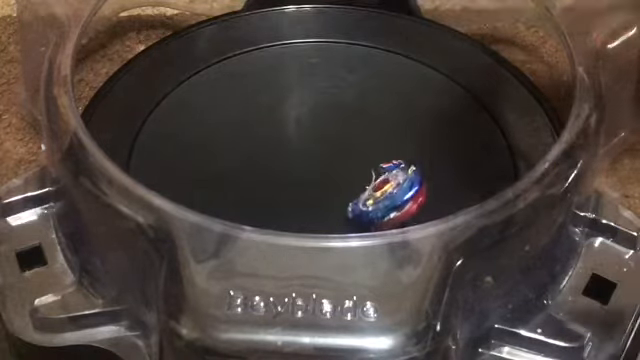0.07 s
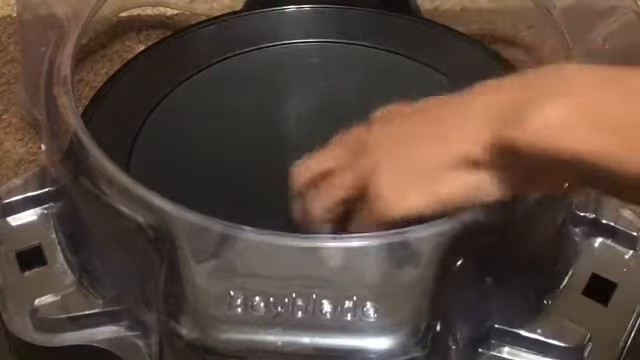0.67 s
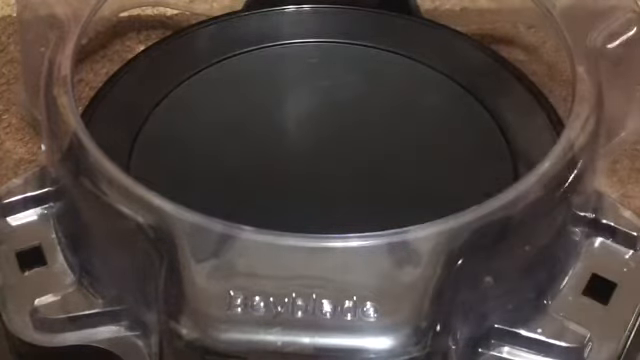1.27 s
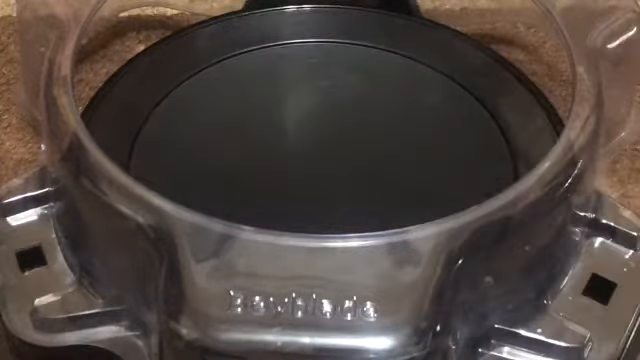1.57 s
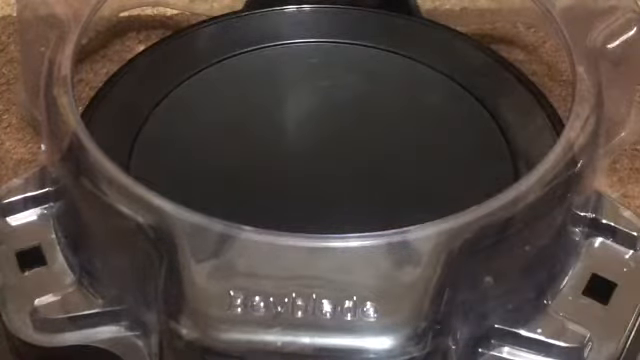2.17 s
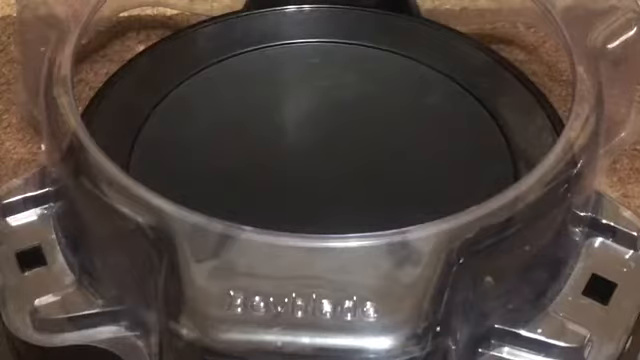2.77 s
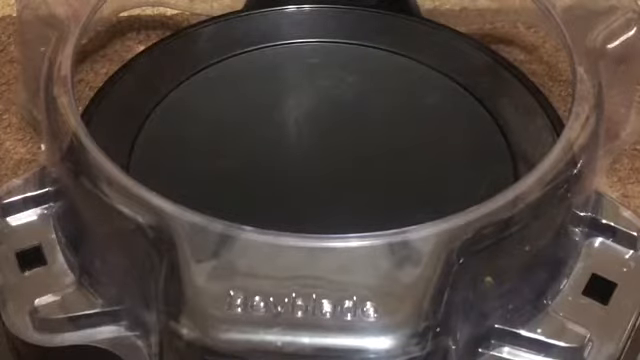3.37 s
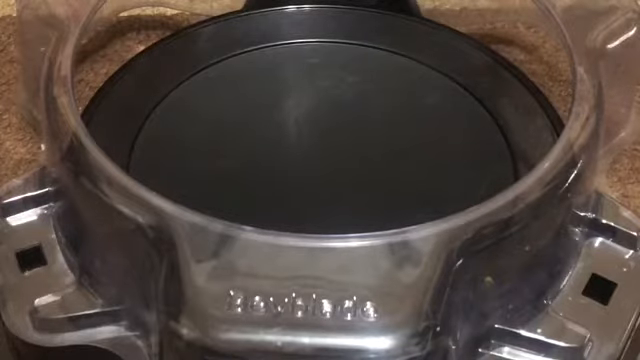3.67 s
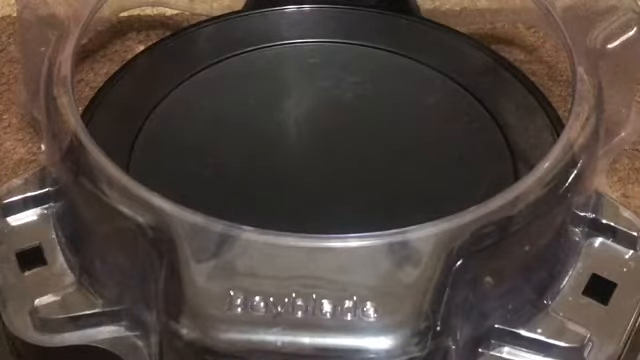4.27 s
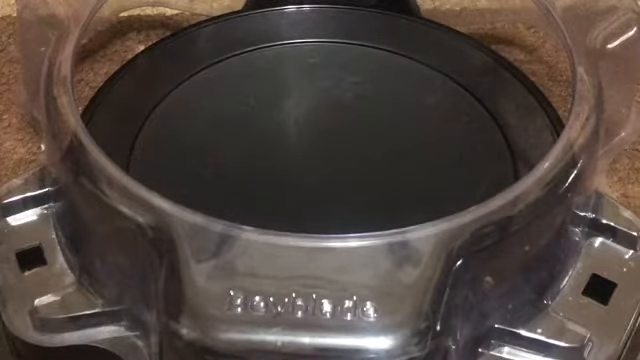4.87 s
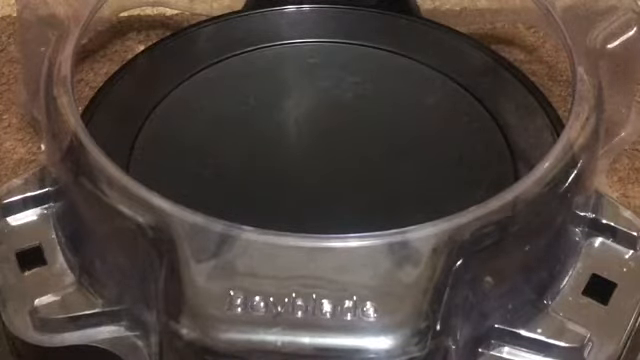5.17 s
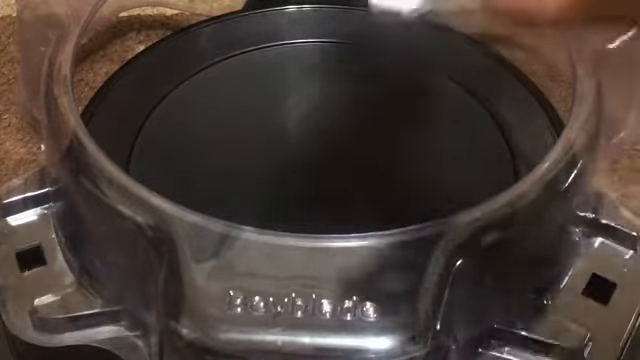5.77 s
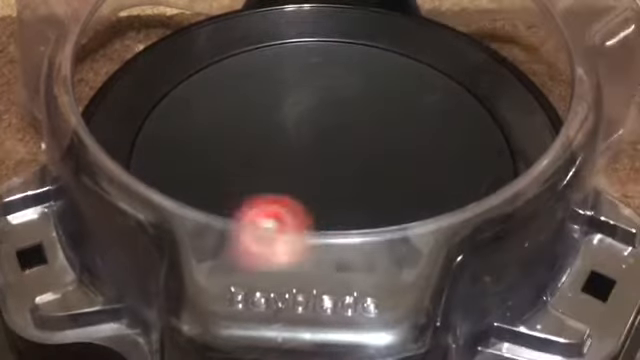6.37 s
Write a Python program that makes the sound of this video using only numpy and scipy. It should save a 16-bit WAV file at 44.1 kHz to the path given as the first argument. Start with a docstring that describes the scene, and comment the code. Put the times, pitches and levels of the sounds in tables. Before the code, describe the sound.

Hands lift a toy top from a plastic bowl and fit it to a launcher with faint clicks, rubs and a few sharper snaps. Near the end a toothed cord rips through the gear in a brief rising, rattling whir. The top hits the bowl with loud hollow knocks and bounces twice. A small room hums softly, heard through a slightly nasal phone microphone.

```python
"""A toy top is ripped off its launcher by a toothed cord: the gear whirs up in pitch, then the top
drops into a thin plastic bowl and bounces twice, driving bending waves that boom and ring.
Before this, hands pick the top out of the bowl and click it onto the launcher, with impacts and
friction on hollow plastic. A small room hums and reverberates, and all is heard through a phone
microphone whose port resonance adds a nasal colour."""
import sys
import numpy as np
from scipy import signal
from scipy.fft import rfft, irfft, next_fast_len
from scipy.io import wavfile

SR = 44100
rng = np.random.default_rng(int(sys.argv[2]) if len(sys.argv) > 2 else 0)


def waveform_to_disk(signal):
    """Save audio, clipped to [-1, 1], as 16-bit WAV at the path in sys.argv[1]."""
    frames = np.transpose(np.atleast_2d(signal))
    scaled = np.clip(frames, -1, 1) * 32767
    samples = np.round(scaled).astype(np.int16)
    wavfile.write(sys.argv[1], SR, samples)


N = 282681
TIME = np.arange(N) / SR
BLOW_TIME = TIME[:SR // 2]
PULL_START_S, PULL_END_S = 5.685, 5.774   # the cord drives the gear
EDGES_HZ = np.geomspace(25, 17000, 24)
# bands of equal frequency ratio: low_hz, high_hz, centre_hz
BANDS = list(zip(EDGES_HZ, EDGES_HZ[1:], np.sqrt(EDGES_HZ[1:] * EDGES_HZ[:-1])))
# plastic parts clicking in the hands: start_s, level_db, hardness_db, chatter_t60_s, slide_s
HANDLING = [(0.09, -64, -17, 0.012, 0.014), (0.168, -74.5, -29, 0.015, 0.016),
            (0.709, -63, -8, 0.027, 0.013), (0.804, -66.5, -27, 0.079, 0.012),
            (0.862, -70, -10, .026, 0.057), (1.0425, -63, -1, .025, .08), (1.108, -61, -7, 0.035, 0.072),
            (1.257, -62, -1, 0.033, 0), (1.3611, -52.5, -1, 0.0088, 0), (1.6133, -71, 9, 0.0086, 0.056),
            (1.6449, -54.5, 6.5, 0.049, 0), (1.7974, -62.5, 9.5, 0.048, 0),
            (1.8156, -57, 10.5, 0.053, 0.049), (1.8211, -48, 3, 0.012, 0.0013), (2.5736, -73, 7, .013, 0),
            (2.6284, -67, -7, 0.021, 0.0069), (2.7001, -57.5, -12, 0.036, 0.0089),
            (2.716, -61.5, -14, 0.034, 0.067), (2.7743, -64, -0.5, 0.02, 0.0049),
            (2.8383, -63.5, -10, 0.02, 0.022), (2.874, -62, 10.5, .025, 0.04),
            (2.9482, -68.5, 5.5, 0.034, 0.0088), (3.022, -60.5, 11.5, 0.082, 0),
            (3.0684, -66.5, 11, .021, 0.027), (3.1459, -60.5, 2, 0.054, 0.029),
            (3.6031, -66, -34, 0.027, 0.0067), (3.6585, -60.5, -15, 0.007, 0),
            (3.682, -68.5, 2, .016, 0.033), (3.7161, -69, 4.5, 0.015, 0), (4.129, -67.5, 2, .02, 0.062),
            (4.2409, -71.5, -3, 0.023, 0.018), (4.5147, -52.5, -12, .048, 0),
            (4.525, -49.5, -2.5, 0.052, .05), (4.5831, -49.5, -13, 0.061, 0.012),
            (4.7679, -45, -6.5, 0.023, 0.0088), (4.786, -55, 0, 0.037, 0.023),
            (4.7953, -46, 3.5, 0.019, 0.072), (4.8097, -42.5, -2, .03, 0), (4.8404, -42.5, -3, 0.025, 0),
            (5.0, -65, -6, .013, 0.0086), (5.021, -63.5, -11, 0.023, 0.051), (5.1522, -70, -7, .016, 0.011)]


def from_db(db):
    """Amplitude grows tenfold every 20 dB."""
    return 10 ** (np.asarray(db) / 20)


def unit_rms(x):
    """Normalise a steady signal by its power."""
    return x / np.sqrt(np.mean(x ** 2) + 1e-20)


def unit_blow(x):
    """Normalise a transient to the energy of ten milliseconds at rms 1."""
    return x / np.sqrt(np.sum(x ** 2) / (.01 * SR) + 1e-20)


def at_hz(points, hz):
    """Interpolate a curve on a log-frequency axis."""
    points_hz, values = np.array(points).T
    return np.interp(np.log(hz), np.log(points_hz), values)


def add(out, start_s, sound):
    """Superpose a sound on the mix."""
    start = int(start_s * SR)
    out[start:start + len(sound)] += sound[:N - start]


def band(x, low_hz, high_hz):
    """Causal Butterworth band-pass."""
    sos = signal.butter(2, [low_hz, min(high_hz, .45 * SR)], "band", fs=SR, output="sos")
    return signal.sosfilt(sos, x + 1e-18)


def bell(x, hz, q, db):
    """A second-order resonant peak or dip."""
    w, height = 2 * np.pi * hz / SR, from_db(db / 2)
    half_width = np.sin(w) / (2 * q)
    numerator = [1 + half_width * height, -2 * np.cos(w), 1 - half_width * height]
    denominator = [1 + half_width / height, -2 * np.cos(w), 1 - half_width / height]
    return signal.lfilter(numerator, denominator, x)


def coloured(x, spectrum):
    """Source and filter: give an excitation a spectral envelope, at rms 1."""
    size = next_fast_len(N)
    hz = np.maximum(np.fft.rfftfreq(size, 1 / SR), 1)
    return unit_rms(irfft(rfft(x, size) * from_db(at_hz(spectrum, hz)), size)[:N])


def decay(t60, delay_s=0):
    """Exponential damping: after a delayed onset, 60 dB are lost every t60 seconds."""
    age = np.maximum(BLOW_TIME - delay_s, 0)
    return (BLOW_TIME >= delay_s) * np.exp(-np.log(1000) * age / max(t60, 1e-3))


def dying_noise(t60, delay_s=0):
    """Damped random vibration."""
    return rng.standard_normal(len(BLOW_TIME)) * decay(t60, delay_s)


def mode(hz, t60, delay_s=0):
    """A freely vibrating mode is a damped sinusoid."""
    return unit_blow(np.sin(2 * np.pi * hz * BLOW_TIME) * decay(t60, delay_s))


def stroke(start_s, length_s):
    """A sine-squared swell and fall."""
    return np.sin(np.pi * np.clip((TIME - start_s) / length_s, 0, 1)) ** 2


def slips(per_s, spread_db):
    """Friction as shot noise: tiny slips of uneven size at random moments."""
    sizes = from_db(spread_db * np.minimum(rng.exponential(1, N), 4))
    return (rng.random(N) < per_s / SR) * sizes * rng.choice([-1, 1], N)


def background(air_db, hum_db):
    """Broadband ventilation rumble lies under a mains hum with slow phase modulation."""
    # room air: frequency_hz, relative_density_db
    air_spectrum = [(25, -23.5), (40, -17), (57, 4.5), (80, -4.5), (100, -3.5), (150, 6.5), (230, -8),
                    (330, -11.5), (480, -8.5), (750, -19), (1400, -27.5), (3000, -41.5), (11000, -43),
                    (16000, -41.5)]
    # hum partials: pitch_hz, relative_level_db
    partials = [(118.4, -57.5), (446.8, -71.5), (500.6, -73), (1077, -77)]
    hum = 0
    for hz, db in partials:
        waver = np.interp(TIME, np.arange(32) / 4, rng.standard_normal(32))
        hum += from_db(db + hum_db) * np.sqrt(2) * np.sin(2 * np.pi * hz * TIME + 0.52 * waver)
    return hum + from_db(air_db) * coloured(rng.standard_normal(N), air_spectrum)


def room(x, wet_db, first_echo_s):
    """Reverberation: convolution with a diffuse tail that dies sooner in the treble."""
    # reverberation time: frequency_hz, t60_s
    decay_times = [(60, 0.43), (500, 0.26), (2500, 0.27), (6000, 0.21), (16000, 0.18)]
    # colour of the tail: frequency_hz, relative_level_db
    colour = [(100, 1.7), (2500, 1.5), (5000, 3.2), (14000, 1)]
    tail = 0
    for low, high, hz in BANDS:
        echoes = dying_noise(at_hz(decay_times, hz), first_echo_s)
        tail += from_db(at_hz(colour, hz)) * band(echoes, low, high)
    return from_db(wet_db) * signal.fftconvolve(x, tail / np.sqrt(np.sum(tail ** 2)))[:N]


def squeaks(width_hz=60):
    """Stick-slip of skin on plastic whistles faintly in a narrow band."""
    # squeaks: start_s, length_s, pitch_hz, level_db
    whistles = [(0.937, 0.061, 870, -60), (2.18, 0.13, 1262, -67), (5.887, 0.033, 1603, -46.5)]
    out = np.zeros(N)
    for start_s, length_s, hz, db in whistles:
        whistle = band(rng.standard_normal(N), hz - width_hz / 2, hz + width_hz / 2)
        out += from_db(db) * stroke(start_s, length_s) * unit_rms(whistle)
    return out


def thuds(gain_db=10.5, t60=0.096):
    """Soft impacts excite only low frequencies: hands nudge the bowl and floor."""
    # nudges: start_s, relative_level_db, pitch_hz
    nudges = [(0.703, -52, 144), (0.716, -59, 715), (0.851, -58.5, 756), (2.713, -53.5, 144),
              (2.757, -49.5, 77), (3.026, -55.5, 220), (3.047, -53.5, 86.4), (4.604, -53, 260)]
    out = np.zeros(N)
    for start_s, db, hz in nudges:
        bump = unit_blow(band(dying_noise(t60), 0.5 * hz, 1.35 * hz))
        add(out, start_s, from_db(db + gain_db) * bump)
    return out


def fingers(rub_db, scrape_db, slide_db=-2.5, slide_max_db=-49, slide_lag_s=.003):
    """Sliding friction: skin rubs dully on hollow plastic, hard edges scrape more brightly."""
    # fingers and parts sliding: middle_s, length_s, relative_level_db, hardness_db
    rubs = [(0.08, 0.56, -80.5, -8), (0.546, 0.39, -76.5, -5), (0.814, 0.53, -68.5, -7),
            (2.172, 0.093, -74, -17), (2.48, 0.089, -71, 6), (2.867, 0.23, -57.5, -13),
            (3.275, 0.065, -64.5, -3), (3.439, 0.06, -69, -11), (3.614, 0.43, -74.5, -1),
            (4.762, 0.045, -58.5, 6), (5.318, 0.56, -71.5, -1), (5.62, 0.45, -72.5, -2.5)]
    # skin rubbing: frequency_hz, relative_density_db
    rub_spectrum = [(200, -15), (500, -18), (900, 12), (1500, 9.5), (2500, -17.5), (5000, -18),
                    (16000, -61.5)]
    # edges scraping: frequency_hz, relative_density_db
    scrape_spectrum = [(800, -8.5), (1500, 4), (2050, 4.5), (2550, 7), (3300, -3.5), (4500, -13.5),
                       (8000, -16), (12000, -39), (16000, -37)]
    # parts also slide around the moment they click
    slides = [(click_s + slide_lag_s, length_s, min(db + slide_db, slide_max_db), hardness_db)
              for click_s, db, hardness_db, _, length_s in HANDLING if length_s > 0]
    moves = [(stroke(middle_s - length_s / 2, length_s), db, hardness_db)
             for middle_s, length_s, db, hardness_db in rubs + slides]
    moves.append((TIME < PULL_START_S, -81, -16))   # the hands never quite rest before the launch
    soft = sum(swell * from_db(db - hardness_db / 2) for swell, db, hardness_db in moves)
    hard = sum(swell * from_db(db + hardness_db / 2) for swell, db, hardness_db in moves)
    rub = from_db(rub_db) * coloured(slips(per_s=1500, spread_db=4.0), rub_spectrum)
    scrape = from_db(scrape_db) * coloured(slips(per_s=1100, spread_db=1.5), scrape_spectrum)
    return soft * rub + hard * scrape


def click(snap_db, body_db, treble_db, chatter_t60, pitch_ratio, chatter_gain=5.1, settle_s=0.00054):
    """A hard impact is broadband: one impulse, then a dying chatter of micro-contacts."""
    touching = rng.random(len(BLOW_TIME)) < .3
    pressing = 1 - np.exp(-BLOW_TIME / settle_s)
    chatter = unit_blow(dying_noise(chatter_t60) * touching * pressing)
    force = unit_blow(signal.unit_impulse(len(BLOW_TIME))) + chatter_gain * chatter
    body = unit_blow(band(force, 1030 * pitch_ratio, 1744 * pitch_ratio))
    snap = unit_blow(band(force, 2080 * pitch_ratio, 3170 * pitch_ratio))
    treble = unit_blow(signal.lfilter([1], [1, -.8], band(force, 1700, 13200)))
    return from_db(body_db) * body + from_db(snap_db) * snap + from_db(treble_db) * treble


def case_clicks(contacts, case_db, hollow_db, spread_octaves=0.12):
    """Impacts excite the case's modes; a harder contact is brighter and less hollow."""
    # the launcher's hollow case: pitch_hz, relative_level_db, t60_s
    case_modes = [(1370, -10.5, .12), (1516, -4.5, 0.18)]
    out = np.zeros(N)
    for start_s, db, hardness_db, chatter_t60, *_ in contacts:
        body_db = db + hollow_db - 0.51 * hardness_db
        treble_db = db - 6 + hardness_db
        pitch_ratio = 2 ** (spread_octaves * rng.standard_normal())   # each strikes another spot
        add(out, start_s, click(db, body_db, treble_db, chatter_t60, pitch_ratio))
        for hz, mode_db, t60 in case_modes:
            add(out, start_s, from_db(body_db + mode_db + case_db) * mode(hz, t60))
    return out


def handling_clicks(stray_count):
    """Light impacts of parts in the hands ring the case, with faint ticks at random moments."""
    # stray ticks: start_s, level_db, hardness_db, chatter_t60_s
    ticks = [(rng.uniform(0, PULL_START_S), rng.normal(-74.5, 4), rng.normal(-2, 5.7), .02)
             for _ in range(stray_count)]
    return case_clicks(HANDLING + ticks, case_db=-10.0, hollow_db=-4.1)


def latch_and_pawl():
    """Impacts of the launcher's mechanism drive its case into resonance."""
    # clacks: start_s, level_db, hardness_db, chatter_t60_s
    clacks = [(4.5948, -43.5, 4.5, .047), (4.603, -34, -3, .02), (5.646, -55.5, -4, .02),
              (5.6685, -51, -4, .042), (5.6745, -33, -3, .034), (5.6805, -29, -1.5, .032),
              (5.7005, -41.5, -7, .028), (5.7495, -29.5, 3, .024), (5.757, -31.5, -7.5, 0.024),
              (5.7665, -29.5, -9, 0.035), (5.7735, -34, 8.5, 0.014), (5.788, -26.5, 0, 0.029),
              (5.7935, -32.5, 10, .016), (5.8085, -45, 7, 0.017), (5.8465, -48.5, 6, .012)]
    return case_clicks(clacks, case_db=-4.5, hollow_db=3.0)


def gear(start_hz=308.7, pull_hz_per_s=14500, coast_hz_per_s=11000, whine_onset_hz=820):
    """Uniform acceleration: the tooth rate climbs under a steady pull, then falls as the gear coasts."""
    whine_db, whine_fade_db_per_s = -26.0, 477
    rasp_db, rasp_fade_db_per_s, rasp_hold_s = -25.0, 542, .026
    pulled_s = np.clip(TIME, PULL_START_S, PULL_END_S) - PULL_START_S
    coasted_s = np.maximum(TIME - PULL_END_S, 0)
    teeth_hz = np.maximum(start_hz + pull_hz_per_s * pulled_s - coast_hz_per_s * coasted_s, 1)
    speed = teeth_hz / teeth_hz.max()
    whine_onset = 1 / (1 + (whine_onset_hz / teeth_hz) ** 4)
    whine_gain = whine_onset * from_db(whine_db - whine_fade_db_per_s * coasted_s)
    rasp_fade_db = rasp_fade_db_per_s * np.maximum(coasted_s - rasp_hold_s, 0)
    rasp_gain = speed ** 1.3 * from_db(rasp_db - rasp_fade_db)
    return teeth_hz, speed, whine_gain, rasp_gain


def ripcord(jitter=0.039, overtone_db=-7, tooth_depth=0.62, sizzle_db=-9, sizzle_growth=4.9):
    """Meshing teeth whine at the tooth rate and modulate a friction rasp that brightens with speed."""
    # gear rasp: frequency_hz, relative_density_db
    rasp_spectrum = [(200, -18.5), (500, -7), (1100, 9), (2600, 2), (4500, -7.5), (8000, -15.5),
                     (16000, -19.5)]
    # sizzle at full speed: frequency_hz, relative_density_db
    sizzle_spectrum = [(1500, -25), (4000, -19), (8000, 7.5), (16000, -4.5)]
    teeth_hz, speed, whine_gain, rasp_gain = gear()
    slip = unit_rms(band(rng.standard_normal(N), 54, 500))
    phase = 2 * np.pi * np.cumsum(teeth_hz * (1 + jitter * slip)) / SR
    overtones = sum(np.sin(k * phase) * (2 / k) ** 1.2 for k in range(2, 7))
    bite = 1 + 0.24 * unit_rms(band(rng.standard_normal(N), 80, 580))   # teeth catch unevenly
    whine = np.sqrt(2) * bite * (np.sin(phase) + from_db(overtone_db) * overtones)
    friction = slips(per_s=11000, spread_db=2.0) * (1 + tooth_depth * np.cos(phase))
    sizzle_gain = from_db(sizzle_db) * speed ** sizzle_growth
    rasp = coloured(friction, rasp_spectrum) + sizzle_gain * coloured(friction, sizzle_spectrum)
    return (TIME > PULL_START_S) * (whine_gain * whine + rasp_gain * rasp)


def bowl_flex(boom_db, knock_db, knock_hz, ring_db, lag_cycles=1.735, modes_db=-10, sweep_db=-4.5):
    """Dispersion: low bending waves travel slowly, so a blow sweeps down to a boom as the shell rings."""
    # the bowl's clearest modes: pitch_hz, relative_level_db, t60_s
    clear_modes = [(170, -3.5, 0.19), (352.4, 5, 0.14), (419, 1.5, 0.11), (585, -1, 0.18),
                   (608.5, -7.5, 0.27), (795.5, 6, 0.16), (840, 5.5, 0.086), (1080, -11, .17),
                   (1112, 1, 0.12), (1330, 0, 0.16), (1441, 5.5, 0.09), (1610, 16, 0.054),
                   (2590, 10, 0.099), (2380, 11.5, 0.054), (2820, 2, .13), (3070, -14, .16)]
    # its crowd of damped modes: frequency_hz, t60_s
    decay_times = [(60, 0.22), (130, 0.084), (300, 0.073), (600, 0.069), (1500, 0.12), (3000, 0.018)]
    # waves scattered by the rim: frequency_hz, relative_level_db
    scatter = [(100, -5.0), (500, -4), (1400, 3)]
    # spectrum of the blow, with knock_hz set by the struck spot: frequency_hz, level_db
    drive = [(30, boom_db - 56), (70, boom_db - 19), (125, boom_db - 1),
             (knock_hz / 2, knock_db - 13.5), (knock_hz, knock_db - 3.5),
             (2.38 * knock_hz, knock_db - 14),
             (1400, ring_db - 9), (2500, ring_db - 23.5), (3600, ring_db - 38)]
    age_s = BLOW_TIME + .001
    sweep_hz = lag_cycles / age_s
    amplitude = from_db(at_hz(drive, sweep_hz) + sweep_db) * np.sqrt(sweep_hz / 25)
    out = amplitude * np.sin(2 * np.pi * lag_cycles * np.log(age_s / age_s[0]))
    for low, high, hz in BANDS[:18]:
        scattered = band(dying_noise(at_hz(decay_times, hz), delay_s=1 / hz), low, high)
        out += from_db(at_hz(drive, hz) + at_hz(scatter, hz)) * unit_blow(scattered)
    for hz, db, t60 in clear_modes:
        ring = mode(hz, t60, delay_s=1 / hz) * rng.choice([-1, 1])
        out += from_db(at_hz(drive, hz) + db + modes_db + rng.normal(0, 3.6)) * ring
    return out


def top_landings():
    """Impact on a thin shell: the top's tip cracks at the contact and sets the bowl flexing."""
    # strikes, at relative levels:
    # start_s, crack_db, treble_db, chatter_t60_s, boom_db, knock_db, knock_hz, ring_db
    strikes = [(5.9582, -52, -70, 0.036, -59, -52, 550, -42),
               (5.9802, -21.5, -35.5, .0074, -52, -23.5, 600, -21),
               (5.995, -62, -55, .0062, -38, -18.5, 374, -22),
               (6.0136, -27.5, -37.5, 0.014, -16.5, -9.5, 484, -23.5),
               (6.027, -54, -60, 0.015, -23, -18.5, 480, -23.5),
               (6.2341, -40, -41.5, 0.054, -22, -16, 288, -25),
               (6.3576, -43, -48.5, 0.069, -29, -26, 390, -29.5)]
    out = np.zeros(N)
    for start_s, crack_db, treble_db, chatter_t60, boom_db, knock_db, knock_hz, ring_db in strikes:
        tip = click(crack_db, ring_db - 2, treble_db, chatter_t60, pitch_ratio=.95)
        add(out, start_s, tip + bowl_flex(boom_db, knock_db, knock_hz, ring_db))
    return out


def scene():
    """Superposition: hands, launcher and top add to their reverberation and the room's background."""
    hands = handling_clicks(stray_count=10) + fingers(rub_db=-2.0, scrape_db=-1.5) + thuds() + squeaks()
    launcher = latch_and_pawl() + ripcord()
    toy = hands + launcher + top_landings()
    reverberation = room(toy, wet_db=-14.5, first_echo_s=0.0035)
    return (toy + reverberation + background(air_db=-54.5, hum_db=0.5))[None]


def record(dry):
    """The microphone port resonates and sheds deep bass; peaks saturate softly and high treble is cut."""
    # port peaks and a dip: centre_hz, q, gain_db
    port = [(1498, 5.86, 9), (1745, 3.35, -3.5), (2513, 3.58, 16), (3650, 29, 4.5), (5000, 2.16, 7),
            (8640, 7.4, 2.5)]
    low_cut_hz, high_cut_hz = 38, 15950
    sound = signal.sosfilt(signal.butter(2, low_cut_hz, "high", fs=SR, output="sos"), dry)
    for hz, q, db in port:
        sound = bell(sound, hz, q, db)
    rounded = sound / (1 + sound ** 8) ** (1 / 8)
    return signal.sosfilt(signal.ellip(10, .2, 70, high_cut_hz, fs=SR, output="sos"), rounded)


dry = scene()
out = record(dry)
waveform_to_disk(out)
```